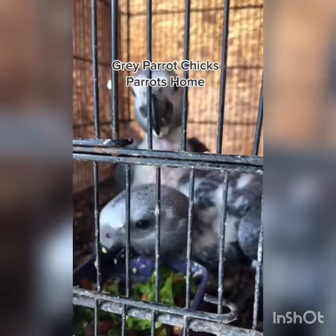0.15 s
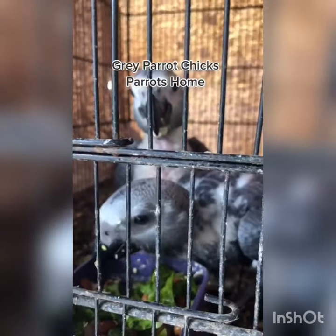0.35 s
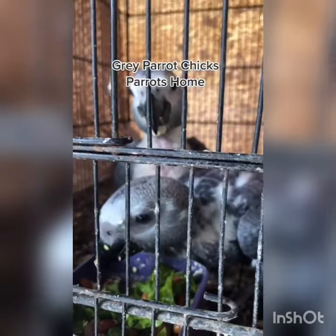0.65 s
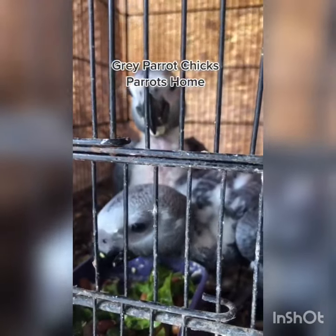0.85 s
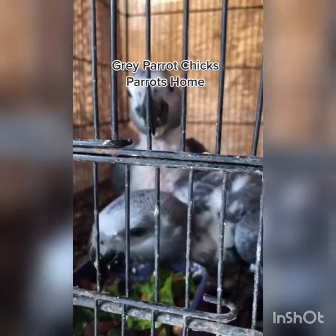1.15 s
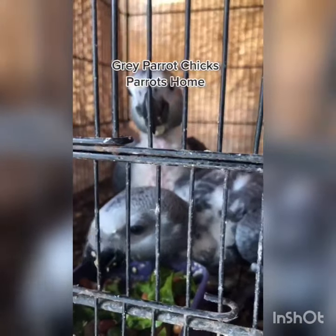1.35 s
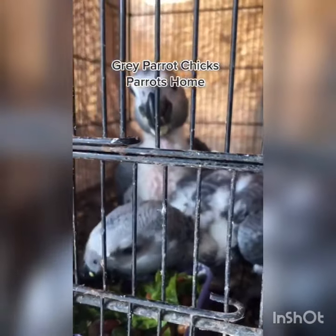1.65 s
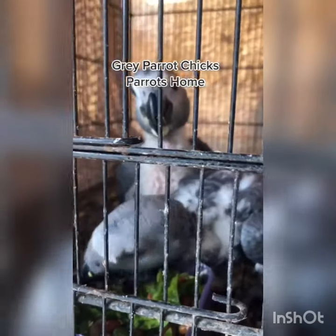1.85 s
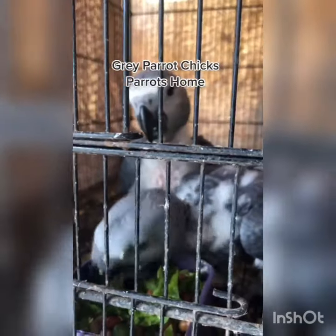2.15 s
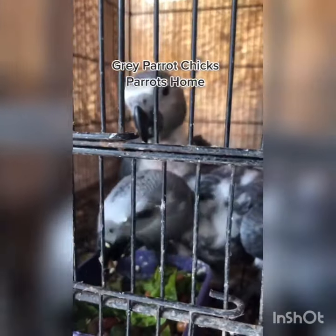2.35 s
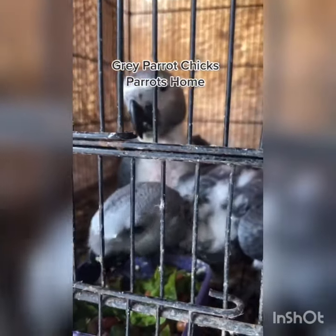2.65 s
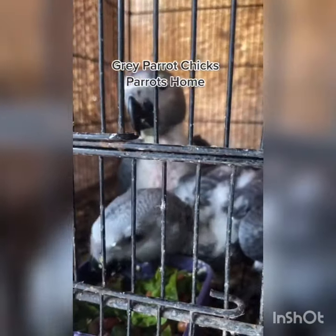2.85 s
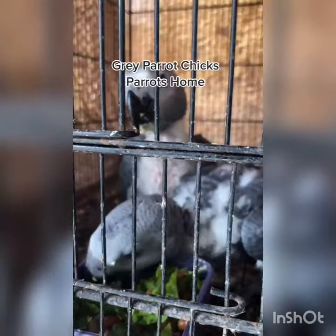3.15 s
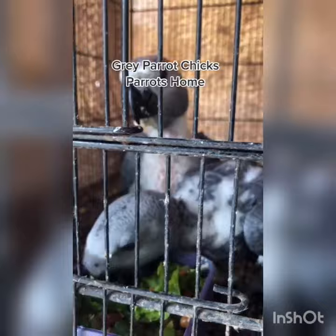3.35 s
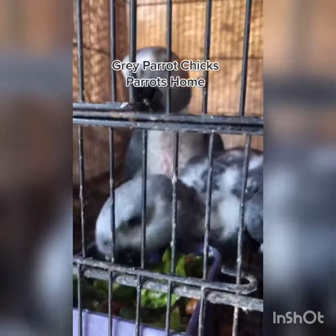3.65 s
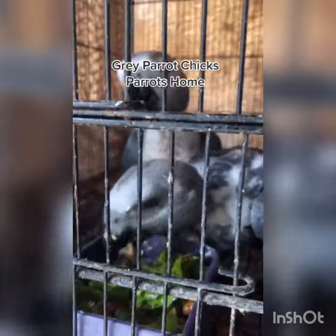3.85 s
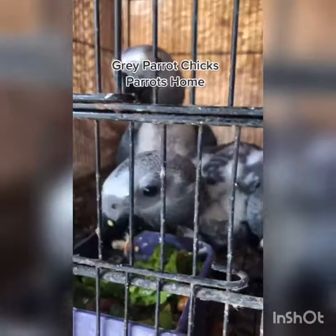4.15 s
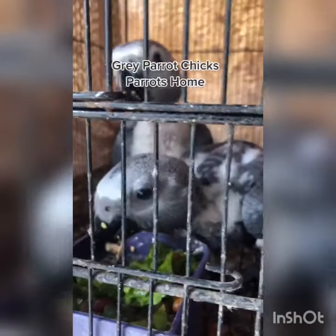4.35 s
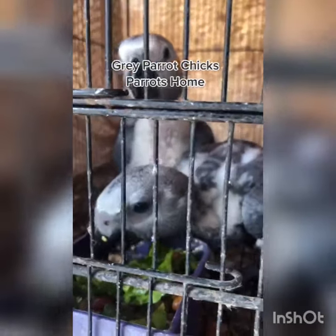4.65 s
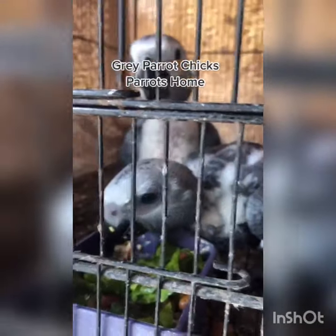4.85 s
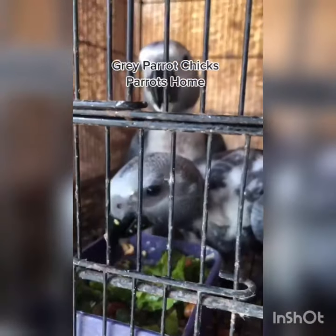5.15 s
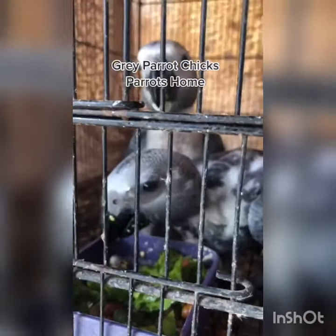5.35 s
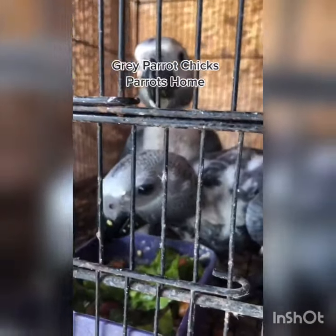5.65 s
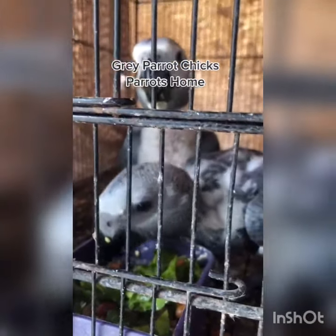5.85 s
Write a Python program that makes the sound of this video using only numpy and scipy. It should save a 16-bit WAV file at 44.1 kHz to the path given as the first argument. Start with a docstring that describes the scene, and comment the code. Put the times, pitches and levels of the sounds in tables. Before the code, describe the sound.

Young parrots in a wire cage give nasal rasping whines and bursts of loud, harsh, warbling squawks, with faint whimpers, hisses and beak taps between.

```python
"""Grey parrot chicks beg in a wire cage, up close: one whines, nasal and rasping, falling in pitch.
Another cuts in with loud warbling squawks; both are syrinx pulses plus air puffs, coloured by a throat.
Between calls: near-pure whimpers, reedy harmonic peeps, sine whistles and filtered-noise hisses.
Noise bursts make beak taps and tub knocks, decaying modes a wire's ping.
Echoes of a small wooden space surround the calls; low filtered noise rumbles beneath."""
import sys
import numpy as np
from scipy import signal
from scipy.fft import rfft, irfft, next_fast_len
from scipy.io import wavfile
from scipy.ndimage import uniform_filter1d

SR = 44100
rng = np.random.default_rng(int(sys.argv[2]) if len(sys.argv) > 2 else 0)


def wav_out(sig):
    """Save sig, one row per channel (or a flat mono array), as 16-bit PCM at SR to the path in sys.argv[1]."""
    wavfile.write(sys.argv[1], SR, np.round(np.clip(np.atleast_2d(sig).T, -1, 1) * 32767).astype(np.int16))


N = 265482
LEAD_IN_S = .3  # rendered before t = 0, then cut off
EDGE_HZ = 12400  # upper band limit

# Whines; one starting after its register break stays low throughout:
# [t/s, length/s, register break t/s, resting f/Hz, final bend/Hz, level/dB, fade after break/(dB/s),
#  roughness/0-1, roughness gain after break/(1/s), fundamental/dB, airy treble/dB]
WHINE_CALLS = [ (1.704, .431, 1.875, 532, 2, -11.8, -40, .1, .6, -.5, -.5),
               (3.468, .245, 3.41, 535, -26, -26.8, 0, .12, .15, 3, 4.5),
               (3.622, .313, 3.728, 520, -48, -17.3, -38, .09, .1, 9, 5.5),
               (4.494, .198, 4.412, 526, 6, -23.8, 0, .09, .3, 0, 0),
               (5.8, .26, 5.957, 524, 0, -13.5, -6, .13, .5, 3, 3.5)]
# Whining throat resonances: [f/Hz, level/dB]
WHINE_THROAT_GAIN = [(300, -38), (520, -10), (850, -12.5), (1250, -3), (1600, 0), (2000, -4), (2300, -10),
                     (2850, -28), (3550, -6), (4100, -14.5), (4700, -15.5), (5900, -19), (7300, -29),
                     (8300, -23), (11000, -35), (12200, -54)]
# Voice cracks: [t/s, half length/s, added roughness/0-1]
WHINE_CRACKS = [(5.81, .012, .55), (5.857, .008, .45)]
# shares of the resting pitch
GLIDE_SHARE, GLIDE_S, GLIDE_LEAD_S = .9, .048, .044
STEP_SHARE, STEP_S = .17, .0045  # drop into the low register
SCOOP_SHARE, SCOOP_S, BEND_S = .075, .016, .045  # scoop up at the start, bend at the end
WHINE_ATTACK_S, WHINE_RELEASE_S = .011, .012
# the high register speaks more slowly and has less top treble
HIGH_ATTACK_S, HIGH_MUTE_SHARE, MUTE_HZ = .018, .5, 5400


def whine(s, length, break_s, rest_hz, bend_hz, level_db, fade_db, hoarse, rasp, first_db, treble_db):
    """Harmonics glide down through throat resonances; the low register tires, rasps; airy treble."""
    t = np.arange(0, length, 1 / SR)
    since_break = s + t - break_s
    high = falling(since_break, STEP_S)
    low_s = np.maximum(since_break, 0)

    glide = GLIDE_SHARE * falling(since_break + GLIDE_LEAD_S, GLIDE_S)
    lift = glide + STEP_SHARE * high
    scoop = 1 - SCOOP_SHARE * high * np.exp(-t / SCOOP_S)
    bend = bend_hz * np.exp((t - length) / BEND_S)
    hz = rest_hz * (1 + lift) * scoop + bend

    attack_s = WHINE_ATTACK_S + HIGH_ATTACK_S * high[0]
    db = level_db + fade_db * low_s + gate_db(t, attack_s, WHINE_RELEASE_S)
    cracks = sum(more * np.exp(-((s + t - at) / half) ** 2) for at, half, more in WHINE_CRACKS)
    rough = hoarse + rasp * low_s + cracks

    drive = syrinx(t, hz, db, rough, first_db, second_db=-6, jitter=.18, air=.85,
                   air_hz=1500, pulse_hz=3900, dulling=.12)
    drive = shaped(drive, lambda f: amp(treble_db * f ** 4 / (f ** 4 + 2800 ** 4)))
    top_treble = shaped(drive, lambda f: falling(MUTE_HZ - f, 150))
    drive = drive - HIGH_MUTE_SHARE * high * top_treble
    return s, faded(amp(db) * throat(drive, WHINE_THROAT_GAIN, size=700))


# Squawks: [t/s, length/s, highest warble crest t/s, warble height/Hz, pitch arch top f/Hz,
#  level/dB, loudest at share of length]
SQUAWK_CALLS = [ (-.2, .22, -.13, 600, 1330, -21, .45), (3.453, .211, 3.5145, 630, 1325, -10.2, .64),
                (3.815, .245, 3.8925, 610, 1345, -11.3, .36), (4.198, .215, 4.2695, 640, 1330, -11.2, .45)]
# Squawking throat resonances: [f/Hz, level/dB]
SQUAWK_THROAT_GAIN = [(150, -74.5), (700, -39), (1200, -16.5), (1850, -6), (2150, -7.5), (2450, 1.5),
                      (2750, -2), (3400, -10.5), (3950, -9), (4450, -22), (5100, -10.5), (5650, -21.5),
                      (6350, -9.5), (7150, -31), (10500, -18.5), (12300, -30.5)]
WARBLE_RATE_HZ, WARBLE_SPREAD_S = 33, .056  # swells and dies round the highest crest
WARBLE_SLIP_S = .0014  # rms; crests come a little early or late
SQUAWK_ENDS_HZ, ARCH_SKEW, ARCH_POWER = 1150, .72, 1.85  # rises quickly, sinks slowly
SQUAWK_EDGE_DB, SQUAWK_SWELL_POWER = -12.5, 1.6
SQUAWK_ATTACK_S, SQUAWK_RELEASE_S = .0025, .008
ROUGH_ONSET, ROUGH_HELD, SETTLE_S = .48, .08, .042
SQUAWK_DULLING_DB = -7  # pressure sinks toward the end, and the overtones with it


def squawk(s, length, crest, height_hz, top_hz, level_db, loudest):
    """Rough onset, narrow pitch crests; in troughs harmonic 2 flares in the main resonance."""
    t = np.arange(0, length, 1 / SR)
    share = t / length
    since_crest = s + t - crest + WARBLE_SLIP_S * wander(t, 30)

    arch = np.sin(np.pi * share ** ARCH_SKEW) ** ARCH_POWER
    low_hz = SQUAWK_ENDS_HZ + (top_hz - SQUAWK_ENDS_HZ) * arch
    crests = abs(np.cos(np.pi * WARBLE_RATE_HZ * since_crest)) ** 2.6
    warble = crests * np.exp(-(since_crest / WARBLE_SPREAD_S) ** 2)
    hz = (low_hz + height_hz * warble) * (1 + .014 * wander(t, 110))

    swell_phase = np.pi * np.interp(share, [0, loudest, 1], [0, .5, 1])
    swell = np.sin(swell_phase) ** SQUAWK_SWELL_POWER
    swell_db = 20 * np.log10(swell + amp(SQUAWK_EDGE_DB) * (1 - swell))
    db = level_db + swell_db + gate_db(t, SQUAWK_ATTACK_S, SQUAWK_RELEASE_S)
    rough = ROUGH_HELD + (ROUGH_ONSET - ROUGH_HELD) * np.exp(-(t / SETTLE_S) ** 2)

    pressure_db = db + SQUAWK_DULLING_DB * share ** 2
    drive = syrinx(t, hz, pressure_db, rough, first_db=-2.5, second_db=-13.5, jitter=.125, air=0.64,
                   air_hz=8000, pulse_hz=14500, dulling=0.47)
    return s, faded(amp(db) * throat(drive, SQUAWK_THROAT_GAIN, size=1336))


def syrinx(t, hz, db, rough, first_db, second_db, jitter, air, air_hz, pulse_hz, dulling):
    """Membrane pulses with uneven timing and strength, and a puff of air in every cycle."""
    turns = np.cumsum(hz * (1 + jitter * rough * wander(t, 444))) / SR
    slack_db = dulling * (db - db.max())  # a softer voice loses its overtones

    # extra level of harmonics 1 and 2, then the whole series from 2 up
    pulses = amp(first_db) * np.cos(2 * np.pi * turns) + amp(second_db) * np.cos(4 * np.pi * turns)
    for k in np.arange(2, EDGE_HZ / hz.min()):
        level = amp(slack_db * np.log2(k)) / np.hypot(1, (k * hz / pulse_hz) ** 2)
        pulses = pulses + level * np.cos(2 * np.pi * k * turns)
    # strong and weak pulses alternate at times
    pulses = pulses * (1 + rough * wander(t, 33) * np.cos(np.pi * turns))

    puffs = (1 + np.cos(2 * np.pi * turns)) * rng.standard_normal(len(t))
    # turbulence is brighter than the pulses
    puffs = amp(slack_db) * shaped(unit(puffs), lambda f: np.hypot(1, f / air_hz))
    flutter = np.exp(rough * wander(t, 180))
    return flutter * ((1 - np.clip(rough, 0, 1)) * unit(pulses) + air * rough * puffs)


def throat(drive, colour, size):
    """Colours the voice, evens its slow level; quick swells through the resonances remain."""
    x = shaped(drive, lambda f: amp(read(colour, f)))
    return x / np.sqrt(abs(uniform_filter1d(x ** 2, size)) + 1e-12)


# Whimpers: [t/s, length/s, start f/Hz, end f/Hz, level/dB, swell/dB, first overtone at 520 Hz/dB]
WHIMPER_CALLS = [(-.08, .108, 505, 492, -27, 0, -1), (.342, .09, 535, 455, -41, -3, -10),
                 (.452, .093, 682, 716, -37, -2, -17), (.549, .385, 826, 796, -40, 1, -17),
                 (2.135, .445, 484, 582, -32.5, 11, -18)]
DROOP_SHARE, DROOP_S, WHIMPER_EDGE_S = .08, .033, .01  # pitch droops as the air runs out


def whimper(s, length, from_hz, to_hz, level_db, swell_db, overtone_db, fall_db=-10):
    """Nearly pure shut-beak tone eases between pitches; overtones fade as the pitch rises."""
    t = np.arange(0, length, 1 / SR)
    eased_hz = from_hz + (to_hz - from_hz) * np.sin(np.pi / 2 * t / length) ** 2
    hz = eased_hz * (1 - DROOP_SHARE * np.exp((t - length) / DROOP_S))
    db = level_db + swell_db * (t / length - .5) + gate_db(t, WHIMPER_EDGE_S, WHIMPER_EDGE_S)
    phase = 2 * np.pi * np.cumsum(hz * (1 + 0.0048 * wander(t, 90))) / SR
    overtones = sum(amp(overtone_db + fall_db * k) * np.sin((k + 2) * phase) for k in range(3))
    tone = np.sin(phase) + overtones * (520 / hz) ** 5
    return s, faded(amp(db + 1.0 * wander(t, 40)) * unit(tone), edge=0.0053)


# Faint, reedy peeps: [t/s, length/s, f/Hz, level/dB]
PEEP_CALLS = [(0.237, .175, 662, -49), (4.776, 0.05, 616, -65.5), (5.031, 0.042, 652, -60.5),
              (5.32, 0.056, 641, -59.5), (5.469, 0.18, 619, -63.5)]


def peep(s, length, hz, db, arch=0.0464):
    """Only a weak voice's high harmonics leave the beak; pitch sags at both ends."""
    t = np.arange(0, length, 1 / SR)
    pitch = hz * (1 - arch * (2 * t / length - 1) ** 4) * (1 + 0.012 * wander(t, 300))
    phase = 2 * np.pi * np.cumsum(pitch) / SR
    harmonics = sum(np.cos(k * phase) for k in range(2, 12))
    voice = band(harmonics, hz=3650, octaves=0.3)
    return s, amp(db) * unit(voice * np.sin(np.pi * t / length))


# Thin falling whistles: [t/s, length/s, start f/Hz, end f/Hz, level/dB]
WHISTLE_CALLS = [(.46, .08, 6850, 6750, -63), (.575, .335, 6640, 6170, -54), (.66, .24, 10620, 10080, -60),
                 (1.418, .06, 1950, 1150, -55), (2.15, .44, 6630, 6280, -63), (2.15, .43, 10300, 9900, -66)]


def whistle(s, length, from_hz, to_hz, db):
    """Air sings unsteadily through the narrowed airway, sinking in pitch."""
    t = np.arange(0, length, 1 / SR)
    hz = from_hz + (to_hz - from_hz) * t / length
    phase = 2 * np.pi * np.cumsum(hz * (1 + 0.0054 * wander(t, 350))) / SR
    return s, faded(amp(db + 3.7 * wander(t, 60)) * unit(np.sin(phase)), edge=.01)


# Soft hisses: [t/s, length/s, level/dB, centre f/Hz, width/octaves]
HISS_CALLS = [(.176, .075, -48, 4100, .42), (.76, .08, -58, 3600, .5), (.98, .08, -58, 3300, .45),
              (1.112, .096, -57, 3340, .56), (1.26, .06, -57, 3700, .5), (1.343, .17, -51, 3886, .4),
              (1.539, .1, -57.5, 4000, .47), (1.638, .077, -52, 4440, .5), (2.374, .13, -53, 4100, .5),
              (4.95, .32, -60, 1900, .11), (5.75, .06, -56, 3000, .6)]


def hiss(s, length, db, hz, octaves):
    """A short, grainy swell of band-shaped noise."""
    t = np.arange(0, length, 1 / SR)
    grains = rng.standard_normal(len(t)) * amp(2 * wander(t, 250))
    swell = signal.windows.tukey(len(t), .8)
    return s, amp(db) * unit(band(grains, hz, octaves) * swell)


# Beak taps: [t/s, peak level/dB, ring f/Hz]
BEAK_TAPS = [(0.531, -44.5, 3680), (3.031, -40, 1050), (3.173, -29.5, 2100), (3.385, -24, 1637),
             (5.728, -31.5, 1100)]
# A chick knocks the feeding tub: [t/s, peak level/dB, ring f/Hz]
TUB_KNOCKS = [(5.954, -16.5, 295), (5.963, -12.5, 315)]


def tap(s, db, hz, decay, octaves, crack):
    """Hard contact: a wide crack and a quickly dying burst around one broad resonance."""
    t = np.arange(0, .08, 1 / SR)
    noise = rng.standard_normal(len(t))
    ring = unit(band(noise, hz, octaves)) * np.exp(-t / decay)
    click = unit(band(noise, 2 * hz, 0.77)) * np.exp(-t / 0.00029)
    burst = ring + crack * click
    return s, amp(db) * burst / abs(burst).max()


# Plucked cage wire modes: [f/Hz, relative level/dB, t60/s]
WIRE_MODES = [(3050, -6.5, 0.68), (4834, -1, 0.48), (7294, 2.5, 0.25), (9960, -1.5, 0.31)]


def ping(s, db):
    """A thin steel bar rings in its bending modes, each wavering in level."""
    t = np.arange(0, .5, 1 / SR)
    modes = 0
    for hz, mode_db, t60 in WIRE_MODES:
        level_db = mode_db - 60 * t / t60 + 7.3 * wander(t, 100)
        modes = modes + amp(level_db) * np.sin(2 * np.pi * hz * t)
    return s, faded(amp(db) * modes, edge=.015)


# Decay of the space: [f/Hz, t60/s]
ROOM_DECAY = [(300, 0.15), (2500, 0.255), (6000, 0.24), (11000, 0.098)]


def room(x, near_db, tail_db):
    """Close bars and boards scatter the higher partials at once; a short diffuse tail follows."""
    t = np.arange(0, .5, 1 / SR)
    near = np.zeros(len(t))
    delays_s = np.linspace(.002, .016, num=9) * rng.uniform(.85, 1.15, 9)
    near[(delays_s * SR).astype(int)] = rng.choice([-1, 1], 9) * np.geomspace(1, .45, num=9)
    # long waves pass round the obstacles
    near = signal.sosfilt(signal.butter(2, 1400, "high", fs=SR, output="sos"), near)

    hz, at, z = signal.stft(rng.standard_normal(len(t)) * (t > .008), SR, nperseg=256)
    decay = amp(-60 * at / read(ROOM_DECAY, hz)[:, None])
    tail = signal.istft(z * decay, SR, nperseg=256)[1][:len(t)]

    echoes = amp(near_db) * near / np.linalg.norm(near) + amp(tail_db) * tail / np.linalg.norm(tail)
    return x + signal.fftconvolve(x, echoes)[:len(x)]


# Rumble spectrum: [f/Hz, relative level/dB]
RUMBLE_GAIN = [(25, -14), (45, -4.5), (80, -1), (160, -7), (350, -9.5), (800, -19), (2000, -24),
               (5000, -36), (12500, -49.5)]
RUMBLE_DB = -48  # rms, before the bass cut


def rumble():
    """Steady low background: spectrally shaped noise."""
    noise = shaped(rng.standard_normal(N), lambda f: amp(read(RUMBLE_GAIN, f)))
    return amp(RUMBLE_DB) * unit(noise)


def amp(db):
    """dB to amplitude."""
    return 10 ** (np.asarray(db) / 20)


def unit(x):
    """Scales to rms 1."""
    return x / np.sqrt(np.mean(x ** 2) + 1e-20)


def read(points, hz):
    """Interpolates a table over log frequency."""
    f, value = np.transpose(points)
    return np.interp(np.log(hz + 1), np.log(f + 1), value)


def shaped(x, gain):
    """Filters x by a gain given as a function of Hz."""
    size = next_fast_len(len(x) + 2048)
    return irfft(rfft(x, size) * gain(np.fft.rfftfreq(size, 1 / SR)), size)[:len(x)]


def band(x, hz, octaves):
    """One broad resonance."""
    return shaped(x, lambda f: 1 / (1 + (np.log2((f + 1) / hz) / octaves) ** 2))


def wander(t, hz):
    """Random drift of rms 1, mostly slower than hz."""
    return unit(shaped(rng.standard_normal(len(t)), lambda f: 1 / (1 + (f / hz) ** 4)))


def faded(x, edge=0.0047):
    """Softens both ends over edge seconds."""
    t = np.arange(len(x)) / SR
    return x * np.clip(np.minimum(t, t[-1] - t) / edge, 0, 1)


def falling(t, width):
    """A smooth step from 1 down to 0 as t passes zero."""
    return (1 - np.tanh(t / width / 2)) / 2


def gate_db(t, attack, release):
    """Level of a call that builds up, holds and lets go."""
    return 20 * np.log10((1 - np.exp(-t / attack)) * (1 - np.exp((t - t[-1]) / release)) + .02)


def add(mix, s, sound):
    """Mixes a sound in at s seconds, cut at the end of the mix."""
    part = mix[max(round((s + LEAD_IN_S) * SR), 0):][:len(sound)]
    part += sound[:len(part)]


def scene():
    """Places all calls and contacts, adds the space and the rumble; two equal channels."""
    near_chick, far_chick, soft, contacts = np.zeros((4, round(LEAD_IN_S * SR) + N))
    for row in WHINE_CALLS:
        add(near_chick, *whine(*row))
    for row in SQUAWK_CALLS:
        add(far_chick, *squawk(*row))
    for row in WHIMPER_CALLS:
        add(near_chick, *whimper(*row))
    for row in PEEP_CALLS:
        add(soft, *peep(*row))
    for row in WHISTLE_CALLS:
        add(soft, *whistle(*row))
    for row in HISS_CALLS:
        add(soft, *hiss(*row))
    for row in BEAK_TAPS:
        add(contacts, *tap(*row, decay=0.0041, octaves=0.56, crack=0.37))
    for row in TUB_KNOCKS:
        add(contacts, *tap(*row, decay=.007, octaves=0.83, crack=0))
    add(contacts, *ping(s=2.72, db=-58))

    mono = room(near_chick, near_db=-6, tail_db=-21)
    mono = mono + amp(-1.5) * room(far_chick, near_db=-5.5, tail_db=-14)
    mono = mono + room(soft, near_db=-5.5, tail_db=-10)
    mono = mono + room(contacts, near_db=-29, tail_db=-11)
    mono = mono[-N:] + rumble()
    return np.array([mono, mono])


def record(dry):
    """The loudest peaks are rounded off; a bass cut and a steep band limit follow."""
    rounded = dry / (1 + (dry / .92) ** 8) ** (1 / 8)
    thinned = signal.sosfilt(signal.butter(2, 50, "high", fs=SR, output="sos"), rounded)
    band_limit = signal.firwin(511, EDGE_HZ, window=("kaiser", 9), fs=SR)
    return signal.oaconvolve(thinned, band_limit[None], "same")


dry = scene()
out = record(dry)
wav_out(out)
```